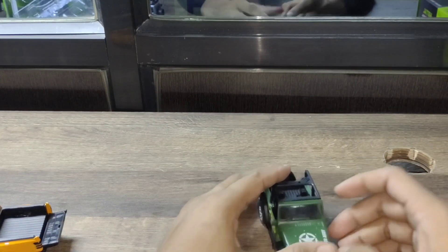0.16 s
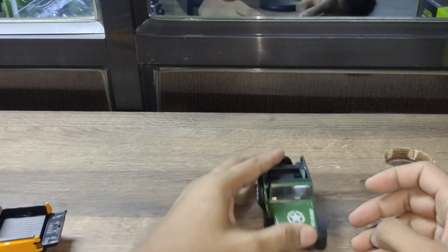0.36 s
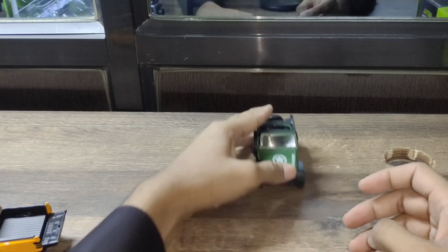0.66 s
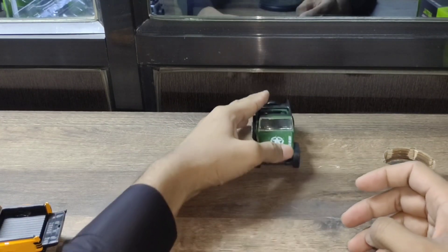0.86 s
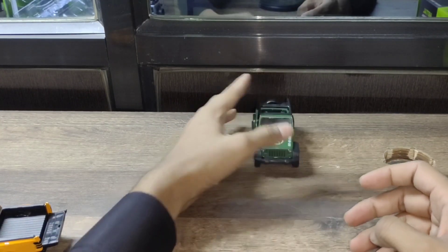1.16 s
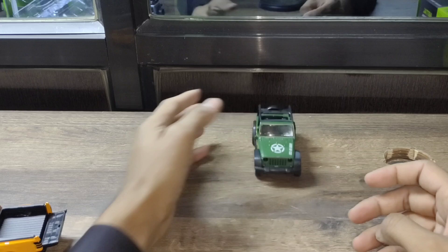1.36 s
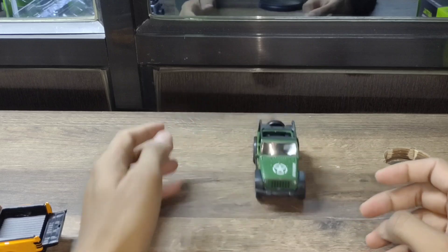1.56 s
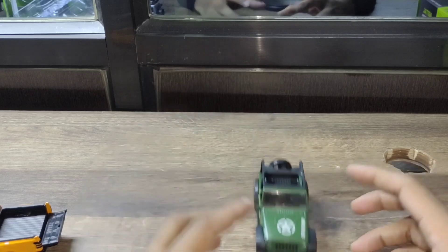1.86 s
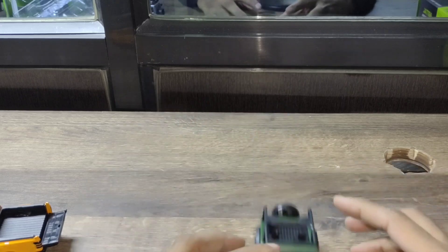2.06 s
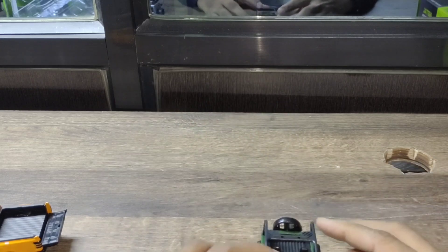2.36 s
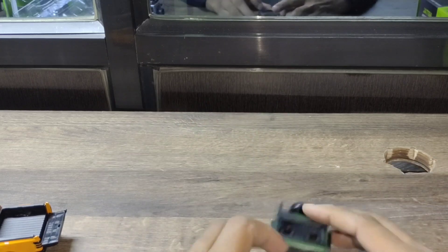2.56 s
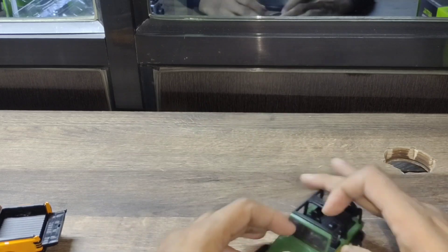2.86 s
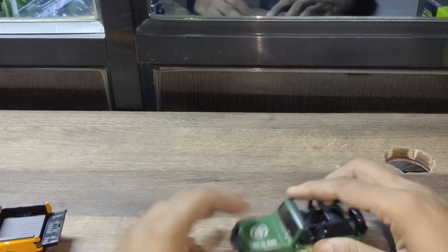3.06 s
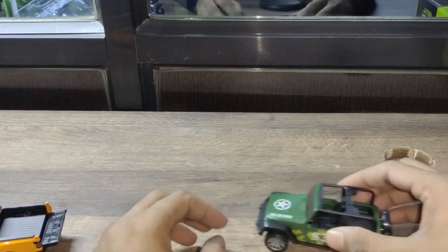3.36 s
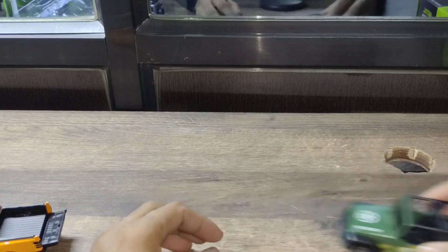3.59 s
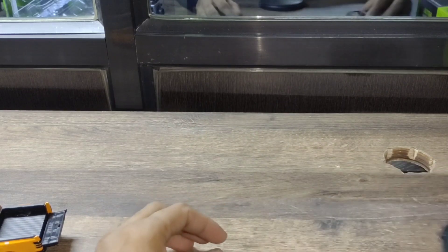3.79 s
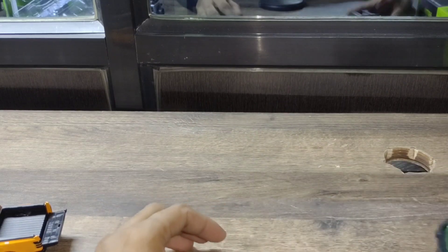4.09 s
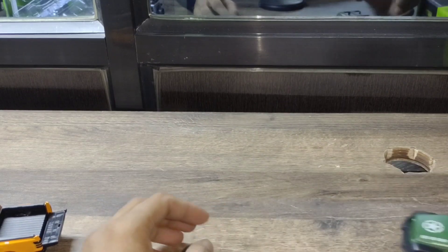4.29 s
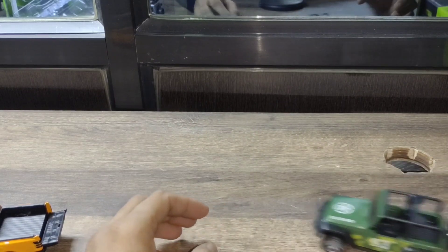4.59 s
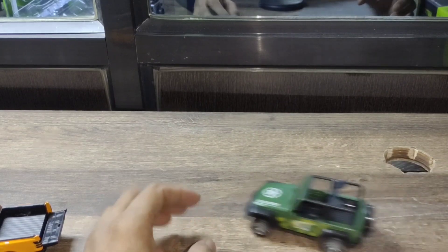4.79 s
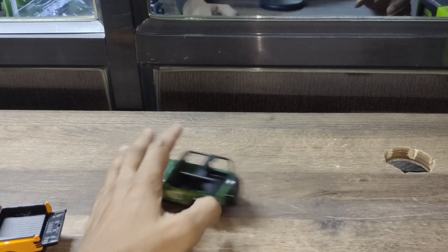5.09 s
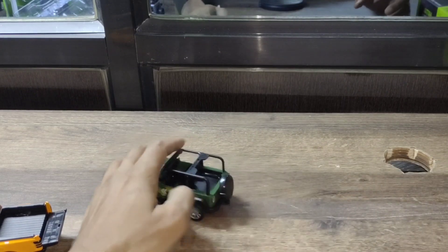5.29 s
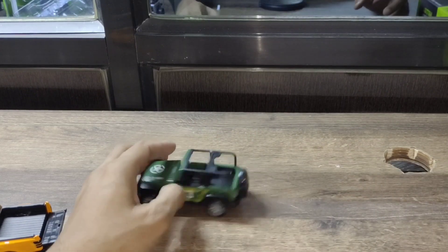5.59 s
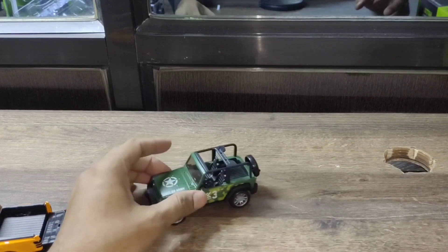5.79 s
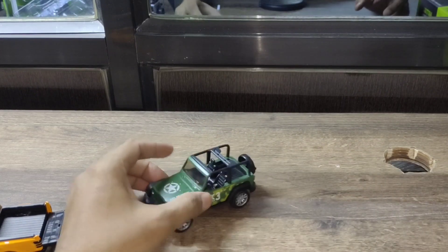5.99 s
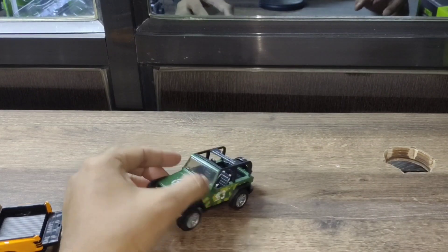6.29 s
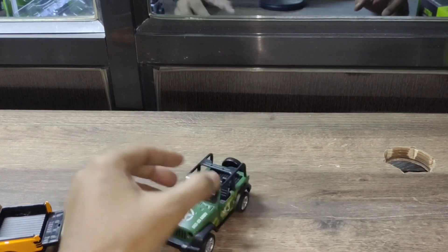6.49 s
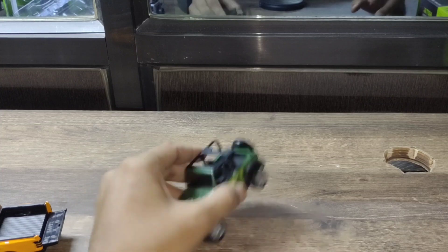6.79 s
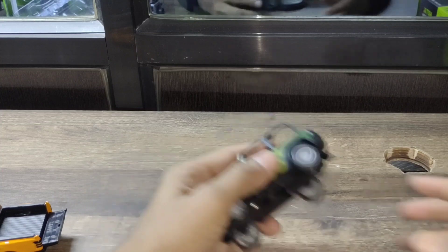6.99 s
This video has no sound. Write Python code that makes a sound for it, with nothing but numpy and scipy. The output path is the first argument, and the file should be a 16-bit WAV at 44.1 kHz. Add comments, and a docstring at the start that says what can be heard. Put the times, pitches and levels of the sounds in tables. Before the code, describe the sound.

A buzzing, clicking wind-up gear train opens at once, bright and grainy, with irregular plastic rattles and a few light knocks on wood. After about two seconds it cuts out, leaving faint to-and-fro rolling, dry wheel hiss and little ticks. The toy then lands with a sharp clack and thud, bounces twice, and its wheels briefly whirr again at the end. Close pickup, small room, low hum.

```python
"""A die-cast toy car on a wooden table in a small room with a soft hum, close to the microphone.
First it is drawn back and let go: its spring motor's gears whirr for two seconds, ringing the car's parts,
while a loose gear rattles in the chassis. Then it is pushed quietly to and fro, wheels crackling over the wood.
It is set down with a knock and two bounces that ring table, body and shell; at the end its wheels
rush again as it is swept off the table."""
import sys
import numpy as np
from scipy import signal
from scipy.fft import rfft, irfft, next_fast_len
from scipy.io import wavfile
from scipy.ndimage import uniform_filter1d

SR = 44100
rng = np.random.default_rng(int(sys.argv[2]) if len(sys.argv) > 2 else 0)


def master(y):
    """Save y as 16-bit WAV."""
    cut = np.clip(np.atleast_2d(y).T, -1, 1)
    pcm = np.round(cut * 32767)  # scale
    wavfile.write(sys.argv[1], SR, pcm.astype(np.int16))


N = 315207
TIME = np.arange(N) / SR

# Colour of the room air. Each row: frequency in [Hz], density in relative [dB per Hz].
AIR_COLOUR = [(18, -78.5), (30, -35), (110, -5), (171, -14), (185, -12.5), (222, -11), (281, -4),
              (346, -13.5), (394, -12), (485, -17.5), (735, -18), (1370, -31.5), (2080, -33.5), (8690, -45),
              (15000, -47)]
# Hum in the room. Each row: centre in [Hz], width in [Hz], rms level in [dB].
HUM_BANDS = [(96.74, 1.3, -67.5), (200.8, 11, -61.5), (286.9, 6.8, -56.5)]
AIR_DB = -50.5
ROOM_T60_S, ROOM_DB = 0.32, -9.5
CUTOFF_HZ = 15600

# Fingers and axle play make the shell tick. Each row: time in [s], relative peak in [dB].
SHELL_TICKS = [(2.6798, -29), (2.72, -28.5), (2.9382, -31), (2.9734, -38), (3.036, -36.5), (3.171, -32.5),
               (3.637, -36), (3.7463, -35), (3.8561, -31.5), (3.973, -38.5), (4.0416, -35), (4.1844, -42),
               (4.668, -41), (4.9868, -36), (5.5667, -40.5), (5.628, -37.5), (6.18, -47.5), (6.5172, -40.5)]
# The car meets the table. Each row: time in [s], then peaks of table thud, body clunk, shell clack in [dB].
LANDINGS = [(0.068, -28, -14.5, -18), (0.678, -32.5, -33, -21.5), (0.717, -36.5, -49, -36),
            (1.217, -33, -30, -40), (5.3022, -41, -34, -30), (6.551, -50, -33, -30),
            (6.5597, -21.5, -17, -9.5), (6.562, -47, -37, -7.5), (6.569, -29.5, -30, -27),
            (6.585, -38, -31, -21), (6.6363, -26.5, -22.5, -22), (6.6403, -30.5, -46, -13.5),
            (6.675, -52, -27.5, -19.5), (6.696, -44, -30, -35), (6.870, -70, -45, -26.5)]
# Resonances of table top, metal body and plastic shell.
# Each row: centre in [Hz], width in [Hz], relative gain in [dB].
TABLE_MODES = [(110, 70, -10), (187.6, 15, 3), (292, 100, -8.5), (430, 111, 1.5), (578, 82, -12.5)]
BODY_MODES = [(792, 260, -5.5), (1060, 180, -0.5), (1233, 79, 3), (1510, 340, -2), (1886, 240, -3)]
SHELL_MODES = [(2430, 520, -4.5), (2816, 150, 2), (3250, 500, -1.5), (4130, 1100, -6), (4730, 740, -5),
               (5330, 460, -9.5), (6090, 830, -10), (7440, 1100, -15.5), (8860, 1700, -24),
               (11500, 3500, -42.5)]

# Pushes of the freewheeling car. Each row: fastest at [s], speeds up over [s], slows over [s],
# relative gear purr in [dB], then beside the purr: wheel hiss, axle hiss and table rumble in [dB].
PUSH_STROKES = [(2.12, 0.14, 0.78, -54, -6, -5, 3), (2.7, 0.14, 0.19, -51, -1, -1.5, -1),
                (3.0, 0.28, 0.099, -48.5, -3.5, -1, -7.5), (3.2, 0.63, 0.8, -59, -2.5, -9, 5),
                (3.6, 0.047, 0.12, -66.5, 1, 7.5, 11), (3.75, 0.22, 0.27, -54, 4.5, -4.5, 6),
                (3.86, 0.17, 0.15, -53, 3, -3.5, -2), (3.98, 0.15, 0.12, -61.5, 7, 0, 3),
                (4.195, 0.11, 0.043, -54.5, 0, -5, 2), (4.28, 0.068, .14, -66, -0.5, -2, -4),
                (4.78, 0.51, 0.45, -55.5, -7, -13, -0.5), (5.18, 0.37, 0.3, -49.5, -3, -7.5, 2.5),
                (5.42, 0.075, 0.42, -67.5, 3.5, -10, -8), (5.82, 0.2, 0.15, -63, 1, -14, 3),
                (6.39, .06, .1, -77, 10.5, 0, -2), (6.51, .06, .05, -62.5, 6, 3, -8),
                (6.69, 0.088, 0.083, -53.5, -14.5, 1, -2.5), (6.85, 0.12, 0.068, -48.5, -5.5, -11, -0.5),
                (7.136, 0.13, 0.077, -36.5, -1.5, -2, -20)]
PUSH_RANGE_DB = 23.5   # how far a push swells and dies over those times
PUSH_ROUNDNESS = 1.19   # 1 = pointed top, 2 = round top
# Colours of wheel hiss, axle hiss, table rumble and idling gears.
# Each row: frequency in [Hz], density in relative [dB per Hz].
WHEEL_COLOUR = [(3300, -24.5), (3850, 1.5), (4200, -2), (4550, 0.5), (5000, -5), (5500, -13), (6200, -44.5)]
AXLE_COLOUR = [(4800, -7.5), (5800, 3.5), (6500, 0.5), (7500, -6.5), (8800, -9), (10000, -16.5),
               (13000, -37.5)]
RUMBLE_COLOUR = [(120, -3.5), (220, -4.5), (350, -5.5), (460, 3.5), (600, -3.5), (800, -6), (1300, -8.5),
                 (2000, -22.5)]
PURR_COLOUR = [(1500, -3.5), (2050, -6.5), (2600, 1), (3200, -11.5), (3650, 1.5), (4100, -12)]
# The idling gears' resonance, which moves about. Each row: time in [s], centre in [Hz].
PURR_CENTRE = [(2.1, 3230), (2.7, 3040), (3.3, 3020), (3.8, 3280), (4.3, 3460), (5.0, 3130), (5.18, 2690),
               (5.6, 3160), (7.1, 3080)]
# The wheels are off the table just before the big knock. The pair: from [s], to [s].
WHEELS_LIFTED_S = (6.525, 6.56)
DRIVE_RUMBLE_DB = -29   # the table under the driven wheels, beside the gear level

# How hard the spring motor works. Each row: time in [s], relative gear level in [dB].
MOTOR_LEVEL = [(0, -26.5), (.3, -24), (.4, -29), (.55, -26.5), (.7, -26.5), (.8, -28), (1.03, -31),
               (1.2, -25), (1.43, -30), (1.63, -24.5), (1.83, -26.5), (2.05, -26.5)]
MOTOR_STOP_S, RUN_DOWN_DB_PER_S = 2.047, 334
# The gearbox's main resonance, which shifts with the load. Each row: time in [s], centre in [Hz].
GEARBOX_CENTRE = [(0, 3870), (.35, 3710), (.5, 4030), (.6, 3850), (.95, 3990), (1.28, 4140), (1.48, 3686),
                  (2.05, 3820)]
# The spring housing's wavering resonance. The row: centre in [Hz], waver in [Hz], width in [Hz], gain in [dB].
HOUSING_MODE = (2027.5, 47.5, 181, -7.5)
# Resonances of gearbox, floor pan, cabin, axles and spring.
# Each row: centre in [Hz], width in [Hz], relative gain in [dB].
GEARBOX_MODES = [(1370, 210, -19.5), (3237, 182, -9), (3549, 177, 1.5), (3972, 180, -5)]
FLOOR_PAN_MODES = [(2316, 180, -6.5), (2613, 158, -2), (2928, 340, -4)]
CABIN_MODES = [(4425, 346, 0.5), (5170, 650, -15.5), (5800, 1280, -13.5)]
AXLE_MODES = [(6566, 350, 5.5), (7300, 280, -8)]
SPRING_MODES = [(8550, 410, 3), (9240, 490, -12.5)]
# Place of the running car. Each row: time in [s], distance from 0 (near edge of the table) to 1 (farthest).
DISTANCE = [(0, 0.11), (.28, 0.055), (.45, 0.67), (.85, 0.76), (1.15, 0.98), (1.5, .8), (1.78, 0.46),
            (2.05, 0.36)]
LET_GO_S, LET_GO_TAKES_S = 1.3, 0.15
GEARBOX_DB = -1.5   # how well the gearbox radiates
# How floor pan, cabin, axles and spring radiate beside it, in that order.
# Each row: gain when near and held in [dB], change when far in [dB], change once let go in [dB].
PART_RADIATION = [(2, -8, -4), (-8, 0, -1.5), (-11, -14.5, -1), (-25.5, 1.5, -6)]

# The loose gear's hardest jumps. Each row: time in [s], relative peak in [dB], time to its rebound in [s].
GEAR_JUMPS = [(0.068, -12.5, 0.0078), (0.1, -13.5, .003), (0.1432, -10.5, 0.0097), (0.1723, -12.5, .005),
              (0.2527, -13.5, .0072), (.2808, -19.5, 0.0035), (0.3348, -12.5, 0.0083),
              (0.4832, -13.5, .003), (0.5056, -16, 0.0087), (0.5263, -10.5, 0.0016), (0.5824, -9.5, 0.0047),
              (0.6623, -13.5, 0.0033), (.7064, -12.5, 0.0091), (.8265, -19.5, .003), (.938, -11.5, 0.0016),
              (0.9722, -17, 0.013), (1.001, -15, 0.0067), (1.044, -20.5, .002), (1.1092, -10.5, .009),
              (1.1419, -14.5, .002), (1.1846, -10.5, .003), (1.2068, -14, .0065), (1.2997, -13.5, .003),
              (1.3752, -11.5, 0.0081), (1.4727, -18.5, 0.01), (1.5245, -15.5, .002), (1.5446, -14, 0.011),
              (1.567, -13.5, 0.0024), (1.587, -16.5, 0.0099), (1.6236, -8.5, .0048), (1.7033, -15.5, .002),
              (1.7203, -11, 0.0028), (1.7478, -7, .0095), (1.7808, -14.5, 0.0095), (1.857, -15.5, .002),
              (1.8679, -12.5, .005), (1.979, -14, 0.0023), (2.012, -14.5, .017)]
# Between jumps it chatters lightly, hardest once in each turn of the wheels; level above the gears, and swing.
CHATTER_PER_S, CHATTER_DB, CHATTER_SWING_DB, WHEEL_TURNS_HZ = 180, 3, 2.5, 26.26
# A jump is a short flight without chatter, a light touch, the strike and a weaker rebound.
FLIGHT_S, TOUCH_AHEAD_S, TOUCH_DB, REBOUND_DB = 0.0097, 0.004, -12, -2.0
REBOUND_MAX_DB = -10.5   # the gear cannot spring back harder than this


def from_db(db):
    """Decibels to gain."""
    return 10 ** (np.asarray(db) / 20)


def rms_one(x):
    """Scale to unit power."""
    return x / np.sqrt(np.mean(x ** 2) + 1e-20)


def in_time(rows):
    """Each column of a curve, sample by sample."""
    s, *columns = np.transpose(rows)
    return [np.interp(TIME, s, column) for column in columns]


def drift(rate):
    """Chance wandering of spread 1, with this many new points a second."""
    points = rng.standard_normal(int(N / SR * rate) + 2)
    return rms_one(np.interp(TIME * rate, np.arange(len(points)), points))


def coloured(x, spectrum):
    """Weight a signal by a spectrum that falls 20 dB per octave beyond its ends; rms 1."""
    hz, db = np.transpose(spectrum)
    size = next_fast_len(N)
    octave = np.log2(np.maximum(np.arange(size // 2 + 1) * SR / size, 1))
    known = np.log2(hz)
    outside = np.abs(octave - np.clip(octave, known[0], known[-1]))
    gain = from_db(np.interp(octave, known, db) - 20 * outside)
    return rms_one(irfft(rfft(x, size) * gain, size)[:N])


def resonate(x, hz, width):
    """A cluster of close modes: a resonance with steep skirts."""
    band = [hz - width / 2, hz + width / 2]
    return signal.sosfilt(signal.butter(2, band, "band", fs=SR, output="sos"), x + 1e-18)


def ring(x, modes):
    """Several resonances in parallel, signs alternating."""
    return sum((-1) ** k * from_db(db) * resonate(x, hz, width) for k, (hz, width, db) in enumerate(modes))


def glide(x, hz, width):
    """A resonance whose centre moves: shift it down to zero, filter, shift back."""
    turn = np.exp(2j * np.pi * np.cumsum(hz) / SR)
    lowpass = signal.butter(2, width / 2, fs=SR, output="sos")
    return 2 * np.real(turn * signal.sosfilt(lowpass, (x + 1e-18) / turn))


def grains(per_s, spread_db):
    """Random small contacts of uneven size."""
    sizes = from_db(spread_db * np.minimum(rng.exponential(1, N), 4))
    signs = rng.choice([-1, 1], N)
    return sizes * signs * (rng.random(N) < per_s / SR)


def background():
    """Soft room noise with a wavering hum, as of a fan: narrow bands of noise."""
    hum = 0
    for hz, width, db in HUM_BANDS:
        band = resonate(rng.standard_normal(N + SR), hz, width)[SR:]   # after a second to build up
        hum = hum + from_db(db) * rms_one(band)
    return hum + from_db(AIR_DB) * coloured(rng.standard_normal(N), AIR_COLOUR)


def room(x, wall_hz=7000, first_echo_s=0.0015):
    """Dense reflections that die away, a little dull."""
    t = TIME[:SR // 2]
    tail = rng.standard_normal(len(t)) * from_db(-60 * t / ROOM_T60_S) * (t > first_echo_s)
    tail = tail / np.linalg.norm(tail)
    tail = signal.sosfilt(signal.butter(1, wall_hz, fs=SR, output="sos"), tail)
    return from_db(ROOM_DB) * signal.fftconvolve(x, tail)[:N]


def strikes(times, levels_db, modes, crunch_s, crunch, skid=0, skid_s=0.034):
    """Each blow is a click, a brief crunch of micro-contacts and a faint skid, ringing the modes."""
    out, t = np.zeros(N + SR), TIME[:SR // 4]
    for s, level_db in zip(times, levels_db):
        fading = np.exp(-t / crunch_s) + skid * np.exp(-t / skid_s)
        force = crunch * rng.standard_normal(len(t)) * fading / np.sqrt(crunch_s * SR)
        force[0] += 1
        blow, at = ring(force, modes), int(s * SR)
        out[at:at + len(t)] += from_db(level_db) * blow / np.abs(blow).max()
    return out[:N]


def ticks(tick_db=-2.5, sharp_db_per_octave=1.0):
    """Tiny sharp contacts favour the shell's high modes."""
    s, db = np.transpose(SHELL_TICKS)
    lowest_hz = SHELL_MODES[0][0]
    modes = [(hz, width, gain_db + sharp_db_per_octave * np.log2(hz / lowest_hz))
             for hz, width, gain_db in SHELL_MODES]
    return strikes(s, db + tick_db, modes, crunch_s=0.003, crunch=2.2)


def knocks():
    """Table top, metal body and plastic shell all answer a landing."""
    s, thud_db, clunk_db, clack_db = np.transpose(LANDINGS)
    thud = strikes(s, thud_db, TABLE_MODES, crunch_s=0.0088, crunch=0.8, skid=0.34)
    clunk = strikes(s, clunk_db, BODY_MODES, crunch_s=0.016, crunch=1.0, skid=0.14)
    clack = strikes(s, clack_db, SHELL_MODES, crunch_s=0.0067, crunch=2.7, skid=0.046)
    return thud + clunk + clack


def motor_db():
    """Level of the gear train, which runs down quickly once the spring is spent."""
    return in_time(MOTOR_LEVEL)[0] - RUN_DOWN_DB_PER_S * np.clip(TIME - MOTOR_STOP_S, 0, 1)


def push_gains():
    """Each push swells and dies away; gains of gear purr, wheel hiss, axle hiss and table rumble."""
    power = 0
    for s, rise_s, fall_s, db, *others_db in PUSH_STROKES:
        from_top = np.maximum((s - TIME) / rise_s, (TIME - s) / fall_s).clip(0, 10)
        swell = from_db(db - PUSH_RANGE_DB * from_top ** PUSH_ROUNDNESS)
        power = power + np.outer(from_db([0, *others_db]) ** 2, swell ** 2)
    return np.sqrt(power)


def wheels(purr_db=-1.5, treble_db=-1.5, rumble_db=-1.0, bump_db=2.5, ring_width_hz=540, loose=0.93, grit=0.65):
    """Idling gears, hard wheels and dry axles crackle over the wood grain; the table top rumbles under them."""
    fine_grain = rms_one(grains(per_s=3000, spread_db=1.0))
    ridges = rms_one(grains(per_s=150, spread_db=2.2))
    contact = fine_grain + grit * ridges
    gear_ring = rms_one(glide(contact, in_time(PURR_CENTRE)[0], ring_width_hz))
    loose_teeth = coloured(grains(per_s=1600, spread_db=1.0), PURR_COLOUR)
    purr = rms_one(gear_ring + loose * loose_teeth)
    hiss, treble, rumble = [coloured(contact, colour) for colour in (WHEEL_COLOUR, AXLE_COLOUR, RUMBLE_COLOUR)]
    purr_gain, hiss_gain, treble_gain, rumble_gain = push_gains()
    pushed = purr_gain * from_db(purr_db) * purr + hiss_gain * hiss
    pushed += treble_gain * from_db(treble_db) * treble + rumble_gain * from_db(rumble_db) * rumble
    driven = from_db(motor_db() + DRIVE_RUMBLE_DB) * rumble
    airborne = (TIME > WHEELS_LIFTED_S[0]) & (TIME < WHEELS_LIFTED_S[1])
    return from_db(bump_db * drift(90)) * ~airborne * (pushed + driven)


def contact_force(graze_s=0.0016, graze=0.46, count=4):
    """A strike at the centre, with slight grazes around it; as strong in the gearbox's range as one click."""
    click = signal.unit_impulse(SR // 50, "mid")
    offsets, sides = rng.standard_normal((2, count))
    places = (len(click) // 2 + graze_s * SR * offsets).astype(int).clip(0, len(click) - 1)
    force = click.copy()
    force[places] += graze * np.sign(sides)
    plain, grazed = [np.abs(resonate(x, 3750, 600)).max() for x in (click, force)]
    return force * plain / grazed


def rattle_force(low_hz=2300, soft_hz=5000):
    """A loose plastic gear chatters and jumps on the chassis; it is light and soft: no bass, little top."""
    swing_db = CHATTER_SWING_DB * np.sin(2 * np.pi * WHEEL_TURNS_HZ * TIME)
    chatter = grains(CHATTER_PER_S, spread_db=-1.0) * from_db(motor_db() + CHATTER_DB + swing_db)
    jumps = np.zeros(N)
    for s, db, rebound_s in GEAR_JUMPS:
        chatter[int((s - FLIGHT_S) * SR):int((s + rebound_s) * SR)] = 0
        touch = (s - TOUCH_AHEAD_S, db + TOUCH_DB)
        rebound = (s + rebound_s, min(db + REBOUND_DB, REBOUND_MAX_DB))
        for at, contact_db in [touch, (s, db), rebound]:
            force = contact_force()
            start = int(at * SR) - len(force) // 2
            jumps[start:start + len(force)] += from_db(contact_db) * force
    return signal.sosfilt(signal.butter(2, [low_hz, soft_hz], "band", fs=SR, output="sos"), chatter + jumps)


def gear_force(pinion_hz=93, mesh_hz=820, wobble=0.08, swing_db=2.5, uneven_db=5.5, rub=0.11):
    """Teeth click past at a wavering rate, harder once in each turn of the off-centre pinion."""
    speed = 1 + wobble * drift(25) + 2 * wobble * drift(600)
    turns = np.cumsum(pinion_hz * speed) / SR
    teeth = np.cumsum(mesh_hz * speed) / SR
    tooth_sizes = from_db(uneven_db * np.clip(rng.standard_normal(N), -2, 1.5))
    clicks = np.diff(np.floor(teeth), prepend=0) * tooth_sizes
    return (clicks + rub * rng.standard_normal(N)) * from_db(swing_db * np.sin(2 * np.pi * turns))


def chassis(force, main_db, main_width_hz=380, waver_db=1.5):
    """All parts of the car ring with the same force, balanced by its distance and the hand's hold."""
    (away,), (main_hz,) = in_time(DISTANCE), in_time(GEARBOX_CENTRE)
    free = np.clip((TIME - LET_GO_S) / LET_GO_TAKES_S + 0.5, 0, 1)   # 0 = held, 1 = let go
    click = signal.unit_impulse(SR // 20)   # each part is scaled by its answer to one click
    main_click = glide(click, main_hz[:len(click)], main_width_hz)
    out = from_db(main_db) * glide(force, main_hz, main_width_hz) / np.linalg.norm(main_click)

    centre_hz, waver_hz, width_hz, housing_db = HOUSING_MODE
    housing_hz = centre_hz + waver_hz * drift(6.6)
    housing_click = glide(click, housing_hz[:len(click)], width_hz)
    out += from_db(housing_db) * glide(force, housing_hz, width_hz) / np.linalg.norm(housing_click)

    parts = [GEARBOX_MODES, FLOOR_PAN_MODES, CABIN_MODES, AXLE_MODES, SPRING_MODES]
    parts_db = [GEARBOX_DB]
    parts_db += [near_db + far_db * away + free_db * free for near_db, far_db, free_db in PART_RADIATION]
    for modes, db in zip(parts, parts_db):
        out += from_db(db + waver_db * drift(9)) * ring(force, modes) / np.linalg.norm(ring(click, modes))
    # back to a scale on which a unit click peaks near 1
    return out * np.linalg.norm(main_click) / np.abs(main_click).max() / 2


def motor(gear_db=-2.0, rattle_db=-0.5):
    """The spring drives the gear train until it is spent; the loose gear rattles along."""
    gears = chassis(gear_force(), main_db=-2.0)
    gears = gears / np.sqrt(uniform_filter1d(gears ** 2, SR // 30) + 1e-12)   # the spring's pull is steady
    rattle = chassis(rattle_force(), main_db=7.0)
    return gears * from_db(motor_db() + gear_db) + from_db(rattle_db) * rattle


def scene():
    """The toy on the table, in its room."""
    toy = motor() + wheels() + knocks() + ticks()
    return (toy + room(toy) + background())[None]


def record(dry):
    """The top is cut steeply."""
    return signal.sosfilt(signal.ellip(10, 0.1, 80, CUTOFF_HZ, fs=SR, output="sos"), dry)


dry = scene()
out = record(dry)
master(out)
```